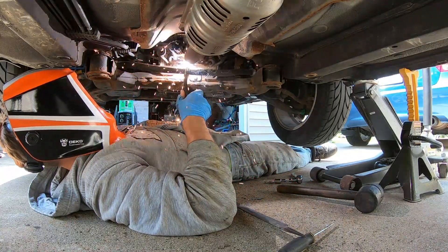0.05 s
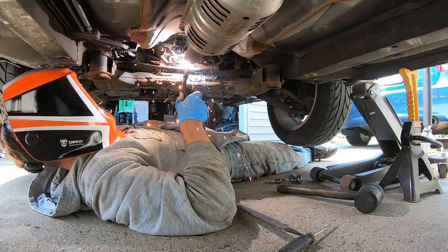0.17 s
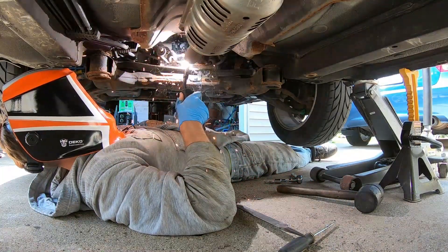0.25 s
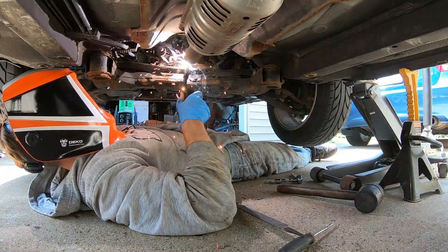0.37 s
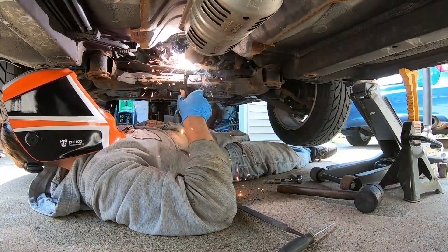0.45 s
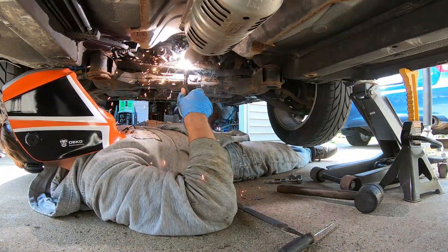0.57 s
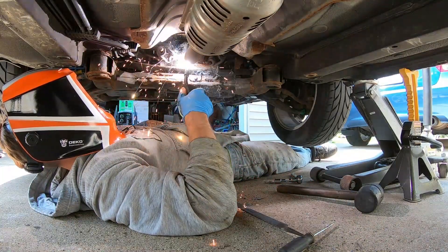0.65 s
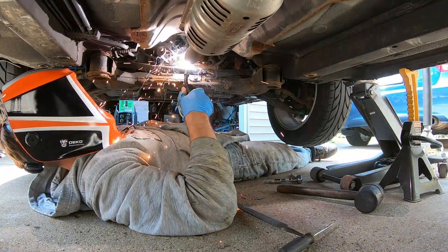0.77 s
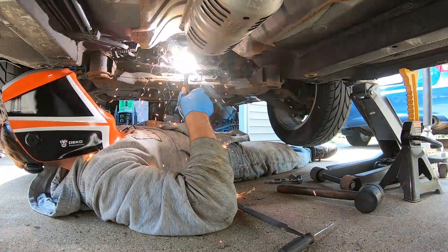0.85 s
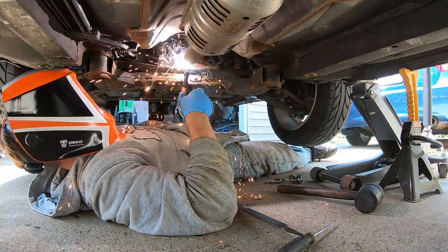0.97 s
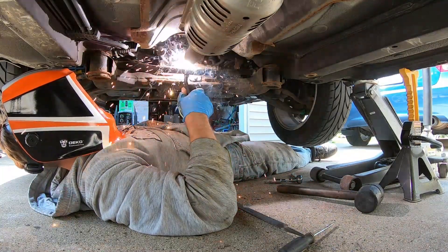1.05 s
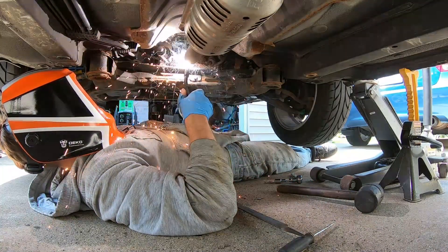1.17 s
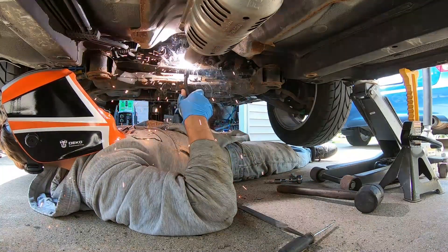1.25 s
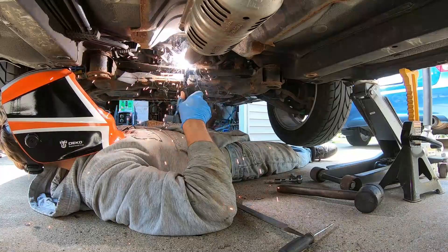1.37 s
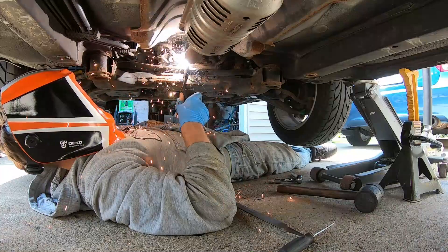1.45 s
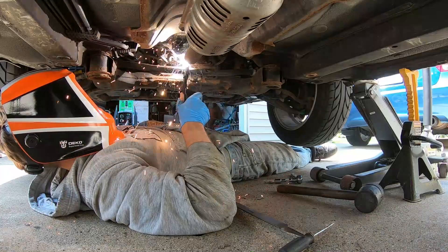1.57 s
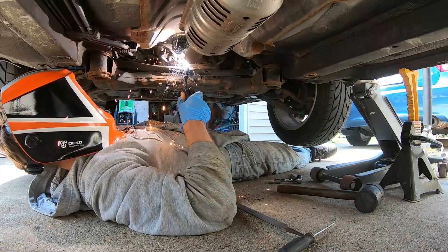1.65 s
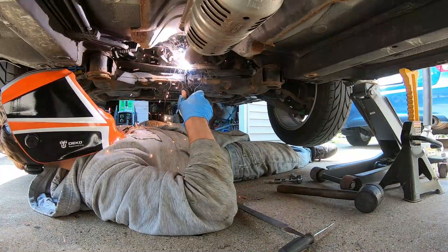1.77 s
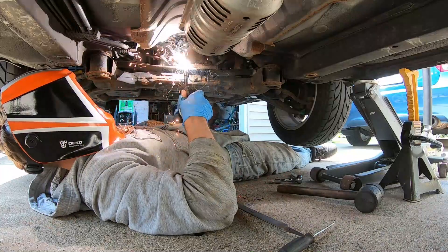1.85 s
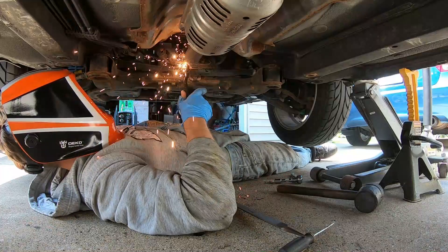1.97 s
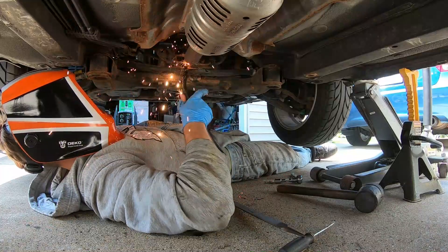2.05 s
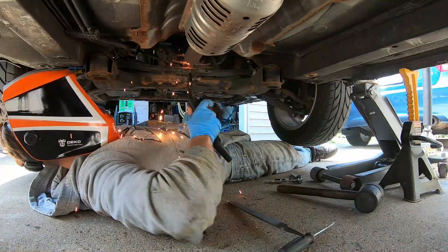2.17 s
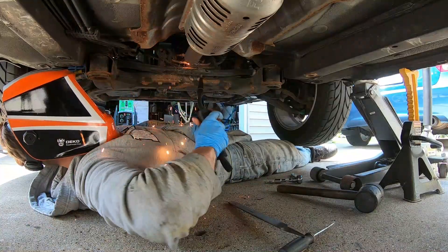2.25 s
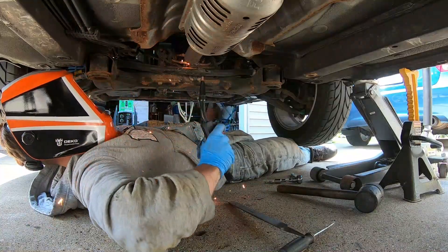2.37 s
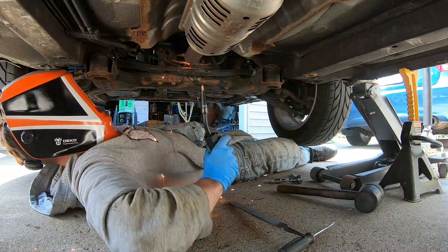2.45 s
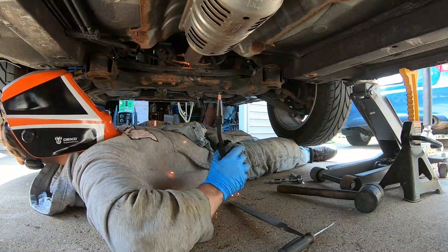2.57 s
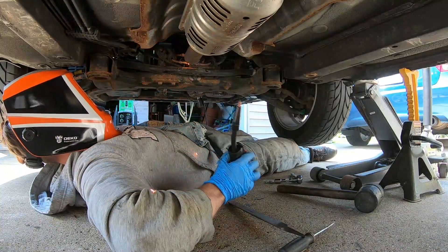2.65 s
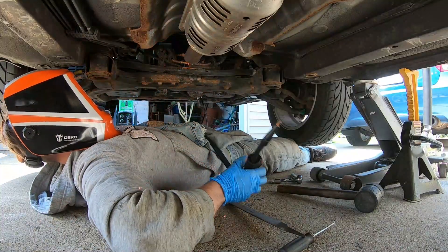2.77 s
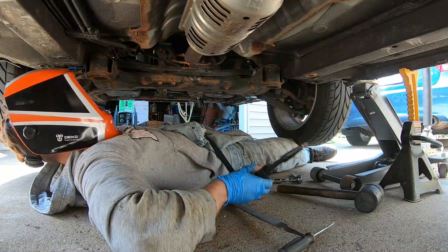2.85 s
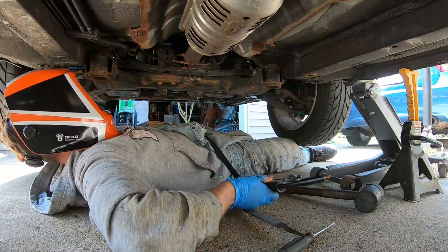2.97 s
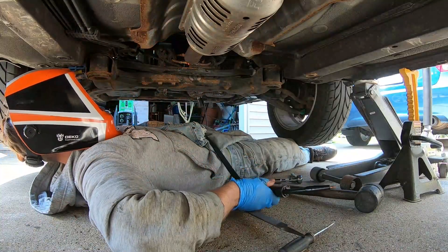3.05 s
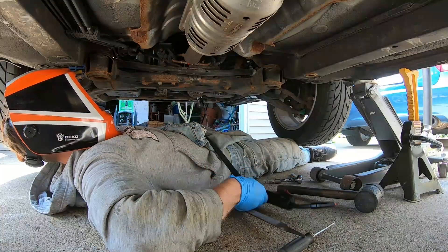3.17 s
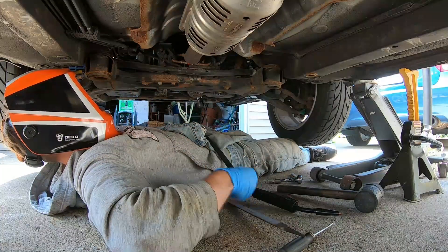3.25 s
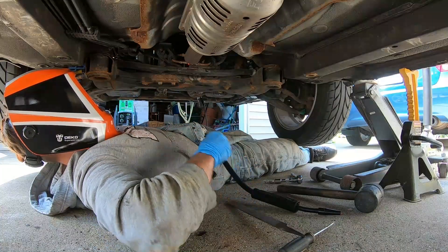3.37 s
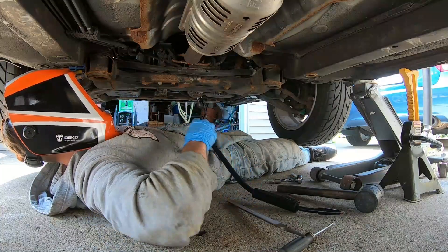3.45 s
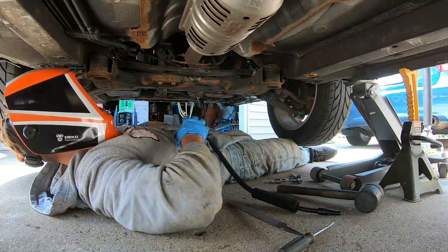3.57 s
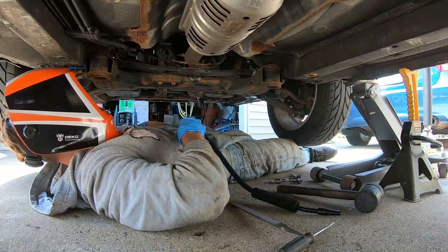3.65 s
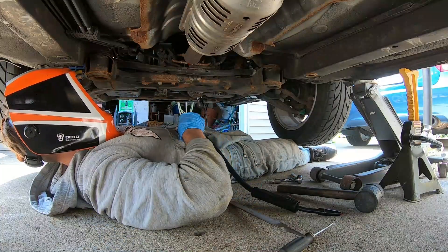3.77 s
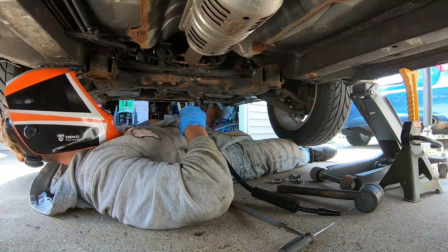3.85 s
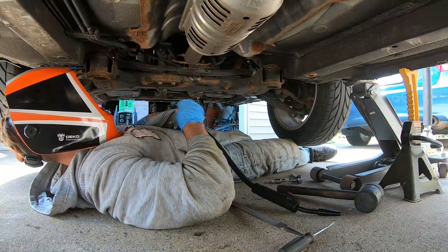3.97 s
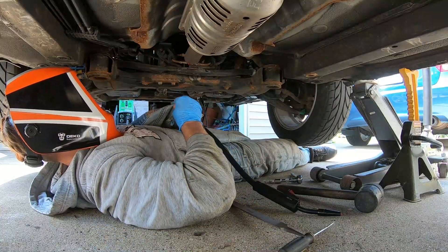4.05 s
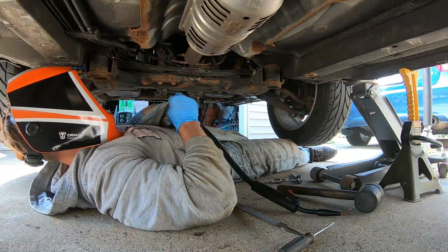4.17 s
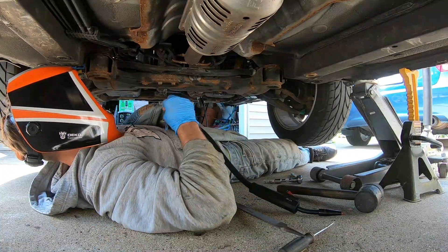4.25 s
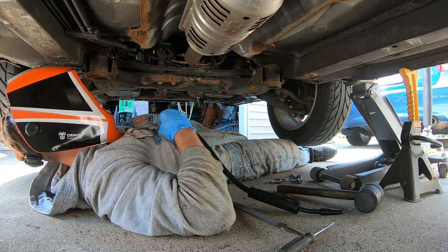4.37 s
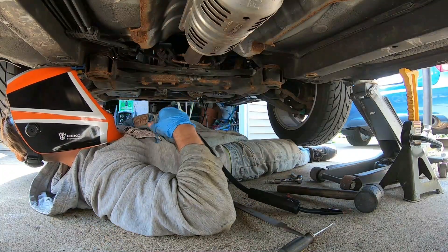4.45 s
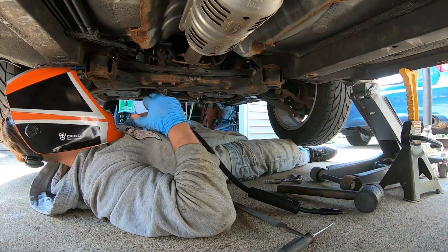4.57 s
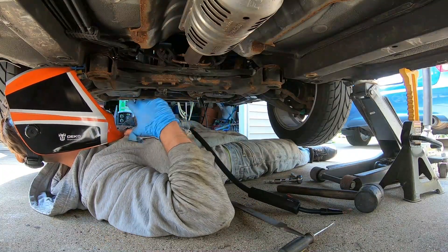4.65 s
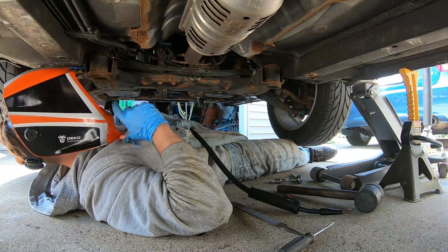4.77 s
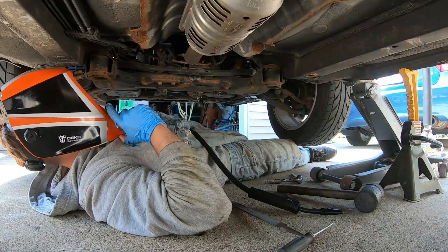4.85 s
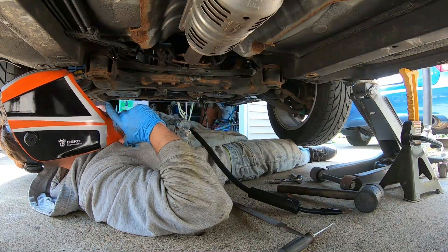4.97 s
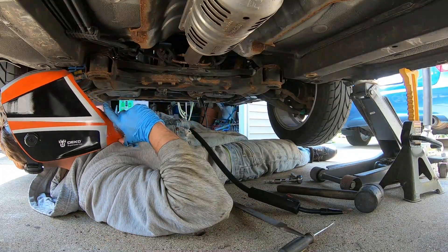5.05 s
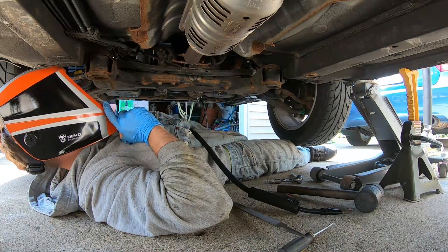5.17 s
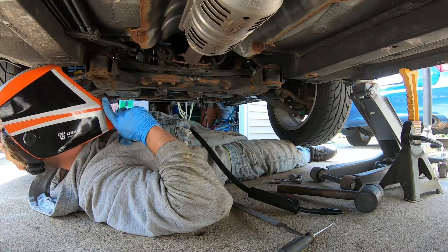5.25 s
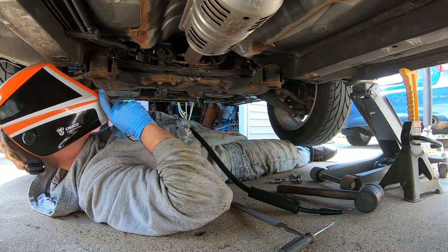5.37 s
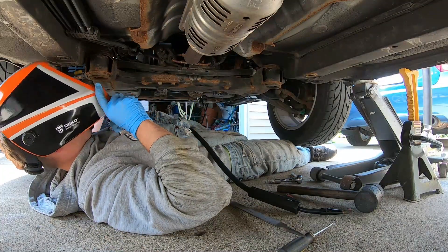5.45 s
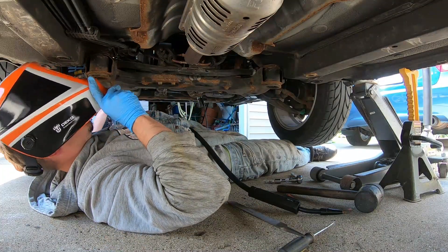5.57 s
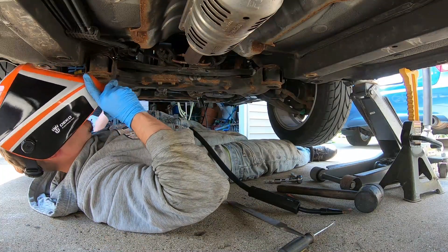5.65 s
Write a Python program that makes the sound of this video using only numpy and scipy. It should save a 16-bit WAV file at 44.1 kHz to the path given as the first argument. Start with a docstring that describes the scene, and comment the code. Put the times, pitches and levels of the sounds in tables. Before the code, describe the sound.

Close, bright and dry beneath a car's metal floor: uneven weld sizzle in hard runs, peppered with sharp spatter pops, ends suddenly near two seconds. A quiet wavering fan whine and low air rumble remain. Cooling metal ticks, a dropped torch strikes concrete and bounces briefly, then glove and sleeve rustle with soft helmet knocks and a last faint squeak.

```python
"""Under a jacked-up car, a flux-core welder lays an overhead bead: filtered noise and random clicks make the arc's
sizzle, and molten drops burst as scattered clicks, all ringing in the gap between floor pan and concrete.
The arc stops, slag ticks, the dropped torch clacks and rings in decaying sines. Shaped noise strokes are a sleeve
rustling up to the helmet, with soft knocks and chirped squeaks. The welder's fan whines on: wavering sines over air noise."""
import sys
import numpy as np
from scipy import signal
from scipy.fft import rfft, irfft
from scipy.io import wavfile
from scipy.ndimage import uniform_filter1d

SR = 44100
rng = np.random.default_rng(int(sys.argv[2]) if len(sys.argv) > 2 else 0)


def generate_wav(sig):
    """Save sig (samples, or channels by samples) to the path in sys.argv[1] as 16-bit PCM at SR."""
    pcm = np.round(np.clip(np.atleast_2d(sig).T, -1, 1) * 32767).astype(np.int16)
    wavfile.write(sys.argv[1], SR, pcm)


N = 251811
TIME = np.arange(N) / SR  # s
RING_SIZE = 8192  # samples in each impulse response
RING_TIME = np.arange(RING_SIZE) / SR  # s
FREQS = np.fft.rfftfreq(RING_SIZE, 1 / SR)  # Hz


def undb(db):
    """Decibels to gain."""
    return 10 ** (np.asarray(db) / 20)


def unit(x):
    """Scale to rms 1."""
    return x / np.sqrt(np.mean(x ** 2))


def unit_energy(h):
    """Scale an impulse response to energy 1."""
    return h / np.linalg.norm(h)


def walk(rate_hz):
    """Slow random curve of rms 1: random steps at the given rate, smoothed twice."""
    step = int(SR / rate_hz)
    stairs = np.repeat(rng.standard_normal(N // step + 1), step)
    smooth = uniform_filter1d(uniform_filter1d(stairs, step), step)
    return unit(smooth[:N])


def bell(centre_s, spread_s):
    """Gaussian swell of peak 1; spread_s is its standard deviation."""
    return np.exp(-.5 * ((TIME - centre_s) / spread_s) ** 2)


def colour(points):
    """Gain at each of FREQS, interpolated over log frequency from (pitch_hz, level_db) points."""
    hz, db = np.transpose(points)
    return undb(np.interp(np.log(FREQS + 1), np.log(hz), db))


def response(gain):
    """Minimum-phase impulse response of unit energy, its spectrum shaped by the gains."""
    cepstrum = irfft(np.log(gain + 1e-6))
    # fold onto positive time: causal
    cepstrum[1:RING_SIZE // 2] *= 2
    cepstrum[RING_SIZE // 2 + 1:] = 0
    return unit_energy(irfft(np.exp(rfft(cepstrum))))


def through(x, h):
    """Pass a sound through an impulse response."""
    return signal.fftconvolve(x, h)[:N]


def hiss(points):
    """Coloured noise from white noise through a filter of unit energy."""
    return through(rng.standard_normal(N), response(colour(points)))


def scatter(early_s, late_s, late_db, rise_s):
    """Dense reflections: a quick flurry from nearby parts, then a tail between car and ground."""
    rise = 1 - np.exp(-RING_TIME / rise_s)
    decay = np.exp(-RING_TIME / early_s) + undb(late_db) * np.exp(-RING_TIME / late_s)
    h = rng.standard_normal(RING_SIZE) * rise * decay
    # many paths together favour no broad band
    power = uniform_filter1d(abs(rfft(h)) ** 2, size=50)
    return unit_energy(signal.fftconvolve(h, response(power ** -.5))[:RING_SIZE])


def hits(rows, paths):
    """A click per row (start_s, level_db, treble_db) along its own path; dull ones are heavier in the bass."""
    out = np.zeros(N + RING_SIZE)
    for (start_s, level_db, treble_db), path in zip(rows, paths):
        tilt = colour([(300, -treble_db), (3500, 0), (12000, treble_db)])
        # a unit-energy click averaged over 4 ms has the rms level_db
        size = undb(level_db) * np.sqrt(.004 * SR)
        start = int(start_s * SR)
        out[start:start + RING_SIZE] += size * signal.fftconvolve(path, response(tilt))[:RING_SIZE]
    return out[:N]


def taps(rows, points, early_s, late_s, late_db, rise_s):
    """Small contacts of one colour, scattered under the car."""
    paths = [scatter(early_s, late_s, late_db, rise_s) for _ in rows]
    return through(hits(rows, paths), response(colour(points)))


# fan tones: pitch_hz, level_db
FAN_TONES_HZ_DB = [(414.5, -61.5), (479, -71), (531.3, -63), (1062.4, -58), (1217, -64.5), (1518, -65),
                   (1593.6, -64.5), (2125, -69), (2656, -82.5), (3187, -75)]
# relative spectrum of fan air and outdoor rumble: pitch_hz, level_db
AIR_COLOUR_HZ_DB = [(20, -15), (45, -9.5), (78, 0), (115, -2.5), (190, -13.5), (255, -11), (420, -16),
                    (650, -22), (950, -25), (1280, -28), (1850, -24), (2700, -33), (3900, -30),
                    (5600, -36.5), (7500, -50.5), (14000, -48)]


def fan(air_db=-45.0, drift=0.0013, flutter_db=2.5, gust_db=0.5):
    """Blade tones waver with fan speed over steady moving air; only the low rumble swells and sinks."""
    warped_time_s = np.cumsum(1 + drift * walk(5)) / SR
    tones = 0
    for pitch_hz, level_db in FAN_TONES_HZ_DB:
        level = np.sqrt(2) * undb(level_db + flutter_db * walk(5.2))  # level_db is rms
        tones = tones + level * np.sin(2 * np.pi * pitch_hz * warped_time_s)
    air = undb(air_db) * hiss(AIR_COLOUR_HZ_DB)
    rumble = signal.sosfiltfilt(signal.butter(2, 150, fs=SR, output="sos"), air)
    return tones + air - rumble + rumble * undb(gust_db * walk(15))


# big bursting drops: start_s, level_db (relative to the other pops), treble_db
POPS_S_DB = [(0.228, -9, 2.5), (0.2871, -17, 9), (0.4018, -14.5, 14), (0.482, -16, 4), (0.494, -14, 6),
             (0.5621, -13, -2.5), (0.5914, -15, 4.5), (0.6178, -20, 4), (0.68, -17.5, 2), (0.741, -18, -1),
             (0.7798, -16, 3.5), (0.85, -14, 6), (0.8722, -14.5, 8), (0.9219, -13.5, -5.5),
             (0.9802, -10.5, 0.5), (1.0712, -13.5, -4.5), (1.0996, -13, 2), (1.1606, -14, 4.5),
             (1.176, -10, 4), (1.195, -10.5, -1), (1.2682, -10, 0), (1.3252, -15, 0), (1.3681, -16.5, -0.5),
             (1.4433, -17.5, 7), (1.5011, -18, -0.5), (1.56, -17, 1), (1.57, -18, 0.5), (1.7358, -14, -1.5),
             (1.7692, -19, 0), (1.7942, -16, 1.5), (1.8253, -14, 3.5), (1.89, -14, 0.5),
             (1.934, -20.5, -4.5)]
# runs where the wire feeds well and the arc fries harder: start_s, length_s, level_db (relative, as BURN_DB)
RUNS_S_DB = [(0.031, 0.046, -27.5), (0.113, 0.068, -28), (0.392, 0.13, -27.5), (0.59, 0.084, -32),
             (0.766, 0.12, -30.5), (1.444, 0.035, -27), (1.789, 0.21, -27)]
BURN_DB, ARC_OFF_S, DIE_DB_PER_S = -31, 1.963, 601
AFTERGLOW_DB, COOL_DB_PER_S = -50.5, 67  # the hot pool fizzes on as it cools
RUN_ATTACK_S, RUN_RELEASE_S = 0.012, 0.009
FLARE_DB, FLARE_S = -15.5, 0.018  # flare_db is relative to the pop's table level


def burn_strength():
    """How hard the arc fries: steady, harder in runs, flaring as it restrikes, dying on trigger release."""
    power = undb(BURN_DB) ** 2
    for start_s, length_s, level_db in RUNS_S_DB:
        rise = np.clip((TIME - start_s) / RUN_ATTACK_S, 0, 1)
        fall = np.exp(-np.maximum(TIME - start_s - length_s, 0) / RUN_RELEASE_S)
        power = power + (undb(level_db) * rise * fall) ** 2
    for start_s, level_db, _ in POPS_S_DB:
        flare = undb(level_db + FLARE_DB) * np.exp(-abs(TIME - start_s) / FLARE_S)
        power = power + (TIME > start_s) * flare ** 2
    since_off_s = np.maximum(TIME - ARC_OFF_S, 0)
    burning = np.sqrt(power) * undb(-DIE_DB_PER_S * since_off_s)
    afterglow = undb(AFTERGLOW_DB - COOL_DB_PER_S * since_off_s)
    return np.hypot(burning, afterglow)


def sizzle(strength, crackle_hz=380, spread_db=5.0, crackle_db=0, gas_db=-7, roar_db=-8, flutter_db=0.5):
    """Tiny discharges over hissing gas; added low-passed roar makes the burn duller than the bursts."""
    sizes = undb(spread_db * np.minimum(rng.exponential(size=N), 3))
    struck = rng.random(N) < crackle_hz / SR
    crackle = unit(struck * sizes * rng.choice([-1, 1], N))
    gas = rng.standard_normal(N) * undb(flutter_db * walk(90))
    burn = strength * (undb(crackle_db) * crackle + undb(gas_db) * gas)
    roar = signal.sosfilt(signal.butter(1, 1500, fs=SR, output="sos"), burn)
    return burn + undb(roar_db) * roar


SPITS_PER_S = 26  # inverse of the median gap
SPIT_DB, SPIT_SPREAD_DB = 4.5, 2  # relative to burn strength
SPIT_TREBLE_DB, SPIT_TREBLE_SPREAD_DB = 5.5, 4


def spits(strength):
    """Small drops burst at uneven gaps, louder in a harder burn: rows (start_s, level_db, treble_db)."""
    chance = rng.standard_normal(size=(90, 3))
    starts_s = np.cumsum(np.exp(.5 * chance[:, 0])) / SPITS_PER_S
    burn_db = 20 * np.log10(np.interp(starts_s, TIME, strength))
    levels_db = burn_db + SPIT_DB + SPIT_SPREAD_DB * chance[:, 1]
    trebles_db = SPIT_TREBLE_DB + SPIT_TREBLE_SPREAD_DB * chance[:, 2]
    return [row for row in zip(starts_s, levels_db, trebles_db) if row[0] < ARC_OFF_S]


# arc spectrum between the resonances: pitch_hz, level_db
ARC_COLOUR_HZ_DB = [(50, -27.5), (150, -13.5), (300, -12), (620, -18), (1100, -15), (1650, -18), (2550, -8),
                    (3000, -19.5), (4500, -12.5), (6000, -11), (7500, -16.5), (9500, -17.5), (13000, -12.5),
                    (15500, -19.5)]
# underbody resonances around the arc: pitch_hz, width_hz (between points 4.8 dB down), level_db
UNDERBODY_HZ_DB = [(501, 58, -11.5), (880, 260, -7.5), (1227, 124, -2.5), (1397, 51, -6.5),
                   (1906, 81, -6.5), (2140, 45, -6.5), (2380, 51, -2.5), (2784, 220, -2),
                   (3162, 74.5, -4.5), (3447, 98, 1.5), (3867, 170, 0.5), (4073, 64, 0), (4436, 130, -2),
                   (4766, 234, 0), (5243, 200, -1.5), (6210, 320, -11.5), (8810, 380, -7.5),
                   (10080, 300, -12), (10800, 620, -9.5), (11900, 350, -13), (13300, 290, -9),
                   (12700, 130, -8), (14170, 470, -8), (15660, 140, -13)]


def arc(pop_db=1, shared=0.36, early_s=0.0011, late_s=0.011, late_db=-17.5, rise_s=0.000608):
    """The sizzle is broken by bursting drops; all of it rings the underbody."""
    strength = burn_strength()
    shape = early_s, late_s, late_db, rise_s
    common = scatter(*shape)
    # the arc wanders over the pool and reaches the car by more than one way
    burn = through(sizzle(strength), common) + through(sizzle(strength), scatter(*shape))
    burn = burn / np.sqrt(2)
    # each drop bursts at its own spot: only part of the reflections stays the same
    drops = list(POPS_S_DB) + spits(strength)
    paths = [np.sqrt(shared) * common + np.sqrt(1 - shared) * scatter(*shape) for _ in drops]
    power = colour(ARC_COLOUR_HZ_DB) ** 2
    for pitch_hz, width_hz, level_db in UNDERBODY_HZ_DB:
        power = power + undb(2 * level_db) / (1 + (2 * (FREQS - pitch_hz) / width_hz) ** 2) ** 1.58
    return through(burn + undb(pop_db) * hits(drops, paths), response(np.sqrt(power)))


# cooling slag and falling spatter: start_s, level_db, treble_db
SLAG_S_DB = [(2.103, -37, 6), (2.2435, -34.5, -1), (2.247, -31, -3), (2.262, -41, -5), (2.431, -43.5, 5),
             (2.685, -52, 3)]
# slag spectrum: pitch_hz, level_db
SLAG_COLOUR_HZ_DB = [(300, -3), (1500, -11), (2300, -6), (2800, 0.5), (3600, 1), (4450, 3), (5050, -4),
                     (5700, 4.5), (6500, -12), (11000, -8), (16000, -16)]


def slag():
    """Cooling slag and falling spatter tick: bright clicks scattered under the car."""
    return taps(SLAG_S_DB, SLAG_COLOUR_HZ_DB, early_s=0.0036, late_s=0.027, late_db=-12, rise_s=.0005)


# strokes of sleeve and glove: centre_s, spread_s, level_db (relative)
RUSTLES_S_DB = [(2.198, 0.024, -56), (2.42, 0.27, -57), (2.915, 0.02, -63), (3.15, 0.013, -52),
                (3.216, 0.038, -47.5), (3.372, 0.051, -59), (3.865, 0.011, -52.5), (4.482, 0.031, -59),
                (4.672, 0.032, -54), (5.02, 0.033, -57.5), (5.215, 0.025, -63), (5.69, 0.032, -64)]
# cloth spectrum: pitch_hz, level_db
CLOTH_COLOUR_HZ_DB = [(300, 7.5), (1500, -0.5), (3800, 9), (6500, -3), (10000, -2.5), (13500, -1),
                      (16000, -6)]


def sleeve(grain_db=2, catch_db=1.0):
    """Cloth slides in short strokes, its fibres catching unevenly."""
    speed = sum(undb(level_db) * bell(centre_s, spread_s) for centre_s, spread_s, level_db in RUSTLES_S_DB)
    catching = unit(undb(grain_db * walk(120) + catch_db * walk(900)))
    return speed * hiss(CLOTH_COLOUR_HZ_DB) * catching


# torch landing and bounces: start_s, level_db, treble_db
TORCH_HITS_S_DB = [(3.2477, -13, 0), (3.2537, -21, -2), (3.272, -34, -7)]
# torch ringing modes: pitch_hz, level_db (relative), t60_s
TORCH_MODES_HZ_DB_S = [(1136, -11, 0.14), (1270, -7, 0.1), (1782, -8, 0.092), (2202, -18, 0.16),
                       (2390, 0, 0.046), (2466, -7, 0.083), (3004, -13, 0.088), (3984, -16, 0.097),
                       (4500, -21, 0.091), (5346, -18, 0.076), (5792, -16, 0.054)]
# clack spectrum: pitch_hz, level_db
TORCH_COLOUR_HZ_DB = [(100, -13), (620, -17), (850, -2.5), (1200, 5), (1800, -0.5), (2350, 3), (3300, -9.5),
                      (4400, -9.5), (5000, -12), (5700, -9.5), (7400, -27.5), (11000, -24.5), (16000, -40)]


def torch(ring_db=-8):
    """The plastic handle clacks on concrete and the nozzle rings briefly in decaying modes."""
    ring = 0
    for pitch_hz, level_db, t60_s in TORCH_MODES_HZ_DB_S:
        phase = rng.uniform(0, 2 * np.pi)
        decay = undb(level_db - 60 * RING_TIME / t60_s)
        ring = ring + decay * np.sin(2 * np.pi * pitch_hz * RING_TIME + phase)
    clack = taps(TORCH_HITS_S_DB, TORCH_COLOUR_HZ_DB, early_s=.002, late_s=.018, late_db=-23, rise_s=.001)
    rings = hits(TORCH_HITS_S_DB, [unit_energy(ring)] * len(TORCH_HITS_S_DB))
    return clack + undb(ring_db) * rings


# soft knocks of arm and helmet: start_s, level_db, treble_db
KNOCKS_S_DB = [(3.364, -48, 1), (3.748, -52, -11), (4.356, -48.5, -18), (4.822, -43, 7), (5.19, -43, 6),
               (5.208, -42.5, -7.5), (5.213, -45, -13)]
# knock spectrum: pitch_hz, level_db
KNOCK_COLOUR_HZ_DB = [(150, 0), (550, -14), (950, 3.5), (1200, -6), (1450, 2), (1700, -9), (2000, 1),
                      (2500, -14), (3300, -6.5), (7000, -24), (16000, -36.5)]


def knocks():
    """Arm and helmet knock softly: clicks weighted to the low mids, scattered under the car."""
    return taps(KNOCKS_S_DB, KNOCK_COLOUR_HZ_DB, early_s=0.0031, late_s=.012, late_db=-15, rise_s=0.0013)


# faint squeaks as the helmet tips up: centre_s, spread_s, pitch_hz, glide_hz_per_s, level_db (peak)
SQUEAKS_S_HZ_DB = [(5.664, .018, 3760, -9000, -56), (5.665, .009, 4570, -3, -62)]


def squeaks(rough=.04):
    """Short rubbing chirps with an unsteady pitch."""
    out = 0
    for centre_s, spread_s, pitch_hz, glide_hz_per_s, level_db in SQUEAKS_S_HZ_DB:
        unsteady_hz = (pitch_hz + glide_hz_per_s * (TIME - centre_s)) * (1 + rough * walk(300))
        chirp = np.sin(2 * np.pi * np.cumsum(unsteady_hz) / SR)
        out = out + undb(level_db) * bell(centre_s, spread_s) * chirp
    return out


def scene():
    """The fan runs throughout; the weld is followed by the small sounds of putting the torch away."""
    return (fan() + arc() + slag() + sleeve() + torch() + knocks() + squeaks())[None]


def record(dry, notch_hz=8294, notch_width_hz=1300, top_hz=15850):
    """The microphone port cancels one narrow treble band; the loudest peaks are rounded and the top is cut."""
    rounded = np.tanh(dry)
    ported = signal.lfilter(*signal.iirnotch(notch_hz, notch_hz / notch_width_hz, fs=SR), rounded)
    return signal.sosfilt(signal.ellip(10, .2, 70, top_hz, fs=SR, output="sos"), ported)


dry = scene()
out = record(dry)
generate_wav(out)
```